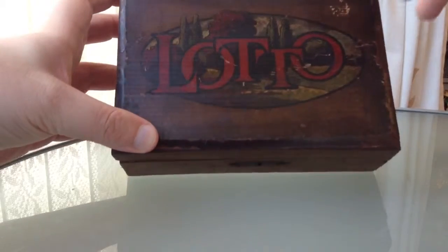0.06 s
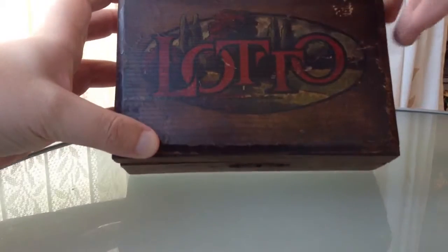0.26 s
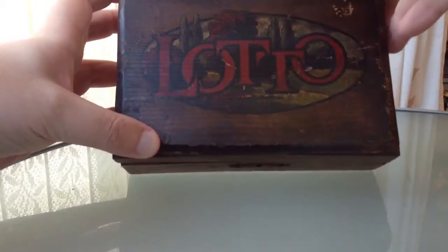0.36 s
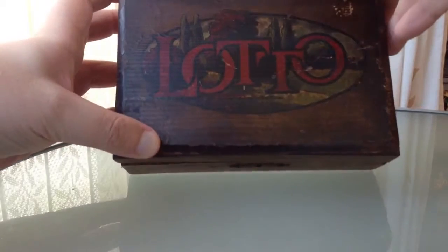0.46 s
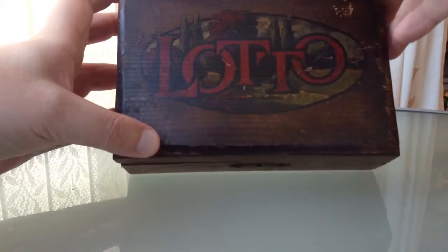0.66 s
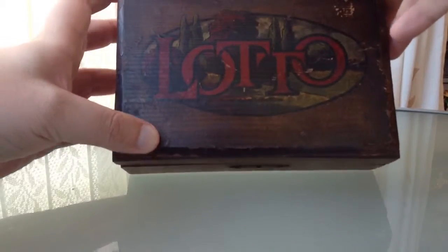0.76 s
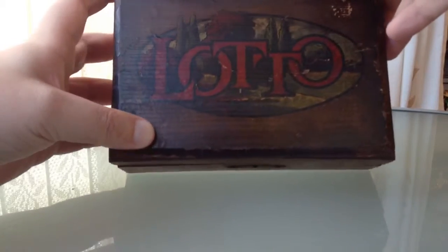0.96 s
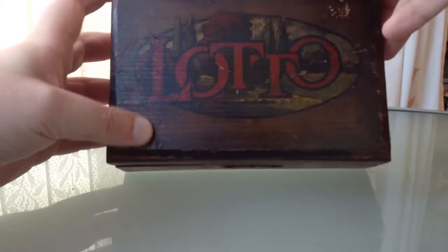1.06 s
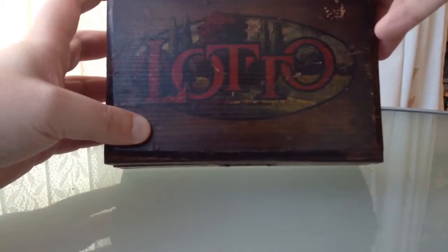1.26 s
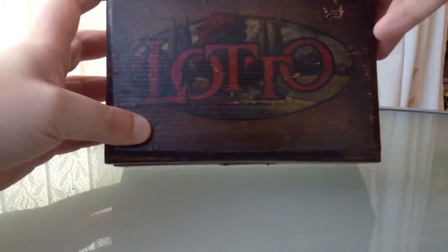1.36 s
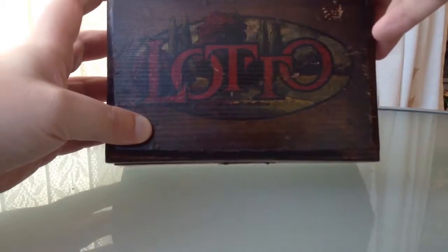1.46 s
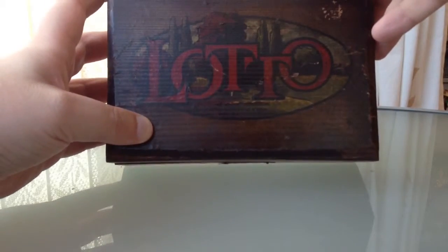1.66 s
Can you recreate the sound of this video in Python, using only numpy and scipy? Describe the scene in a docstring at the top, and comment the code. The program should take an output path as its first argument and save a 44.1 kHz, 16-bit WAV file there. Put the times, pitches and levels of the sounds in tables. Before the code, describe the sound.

A wooden box clacks and knocks close by in a quiet room. After a small latch tick, the lid clacks at 0.2 seconds with a low microphone thud. Dull taps and faint rubbing surround a second clack at 0.65 seconds. Fingers brush the wood, then bump it with a tick near 1.2 seconds. The hardest clack thuds at 1.4 seconds, followed by a brief rattle and lighter knocks.

```python
"""An old wooden box is shifted between two hands on a glass table in a small, quiet room.
A latch ticks; at 0.2 s the lid clacks and the microphone overloads with a low thud. Dull taps follow as
the box rocks and its contents shift; wood rubs faintly on wood. A second clack comes at 0.65 s, then
fingers brush the varnish and bump the hollow box, nails ticking. At 1.39 s the hardest clack overloads
the microphone again; loose pieces chatter, lighter knocks trail off."""
import sys
import numpy as np
from scipy import signal
from scipy.fft import rfft, irfft, next_fast_len
from scipy.io import wavfile

SR = 44100
rng = np.random.default_rng(int(sys.argv[2]) if len(sys.argv) > 2 else 0)


def store_wav(level_fs):
    """Save 16-bit WAV to argv[1]."""
    pcm = np.round(np.clip(np.atleast_2d(level_fs), -1, 1) * 32767)
    wavfile.write(sys.argv[1], SR, pcm.T.astype(np.int16))


N = 74970
TIME_S = np.arange(N) / SR

# room noise spectrum: freq_hz, gain_db
NOISE_SPECTRUM = [(25, -17.5), (70, -44.5), (110, -21), (170, -5.5), (300, 0.5), (600, -3.5), (3000, -15),
                  (7000, -18.5), (15000, -19.5)]
# diffuse reverberation: centre_hz, level_db, t60_s
REVERB_BANDS = [(100.7, -19.5, 0.36), (292, -3, 0.48), (990, -8, 0.23), (2135, -15.5, 0.27),
                (3945, -17.5, 0.27), (6100, -18.5, 0.25), (8560, -20.5, .28), (14200, -39, 0.45)]
# nearest walls: delay_s, level_db
WALL_ECHOES = [(0.0143, -24.5), (0.0326, -30.5)]
# standing waves: pitch_hz, peak_db, t60_s
ROOM_MODES = [(376.7, 1, 0.08), (415, 2.5, 0.26)]

# skin brushing varnish: start_s, length_s, level_db, centre_hz
BRUSHES = [(0.737, 0.31, -63, 10380), (1.021, 0.037, -58.5, 11000), (1.09, 0.049, -53.5, 5830)]
# skin hiss spectrum: freq_hz, gain_db
BRUSH_SPECTRUM = [(300, -17), (1500, 10), (4000, 6.5), (8000, 4), (12000, 8.5), (15000, 3)]
# wood rubbing on wood: start_s, length_s, level_db
RUBS = [(0.135, 0.12, -41.5), (0.377, 0.19, -51.5), (0.682, 0.18, -51.5), (1.205, 0.18, -50)]

# soft finger bumps: start_s, level_db, contact_lowpass_hz, spot_hz, spot_boost_db
BUMPS = [(0.023, -39.5, 300, 213, 29), (1.1745, -20.5, 450, 330, 12.5), (1.1839, -2.5, 480, 403, 9),
         (1.3469, -10, 700, 200, 12.5), (1.352, -4, 900, 794, 6.5), (1.3677, -17.5, 900, 420, 13)]
# hollow box under a soft touch: pitch_hz, peak_db, t60_s
HOLLOW_MODES = [(169, 4.5, 0.042), (325.5, -1, 0.018), (378.4, 2.5, 0.014), (546, 0.5, 0.012),
                (802, 9.5, 0.04)]
# small bright ticks of latch and fingernails: start_s, level_db
TICKS = [(0.1068, -12), (0.439, -11), (.7650, -8.5), (1.1828, 1)]
# tick spectrum: freq_hz, gain_db
TICK_SPECTRUM = [(1000, -21.5), (2300, -12), (4000, -20), (6500, -13), (8000, -20.5), (11700, -15.5),
                 (14200, -22.5)]

# dense weak modes crackling after a contact: freq_hz, gain_db
CRACK_SPECTRUM = [(60, -43.5), (200, -25), (450, -0.5), (1300, -2), (3100, 6.5), (6000, 5.5), (10000, 5),
                  (12500, -6.5), (15000, 4.5)]
# dull taps: start_s, level_db, contact_lowpass_hz, spot_hz, spot_boost_db
TAPS = [ (.1500, -25.5, 3040, 1400, 18), (0.4409, -13.5, 2700, 1770, 6), (0.4756, -13, 2370, 1870, 10),
        (0.5036, -8, 3040, 1950, 11.5), (0.525, -19.5, 2100, 1030, 11.5), (0.5782, -8.5, 4660, 322, 6),
        (0.593, -1.5, 2670, 790, 4), (.6552, 3, 2920, 2380, 12.5), (0.7238, -8.5, 2370, 715, -6.5),
        (0.735, -8, 2170, 1300, -2), (0.7984, -12.5, 2560, 940, 2.5), (0.8425, -23.5, 2690, 890, 3),
        (0.8591, -18.5, 2600, 2070, 1), (.9285, -26, 1890, 540, 12.5), (1.0978, -17, 2470, 396, 5.5),
        (1.2698, -9, 2580, 2030, 4.5), (1.2946, -13, 3130, 900, 5.5)]
# whole loaded box: pitch_hz, peak_db, t60_s
BOX_MODES = [(308, 0, 0.052), (409, -3, .035), (556, 5.5, 0.014), (837, 6.5, 0.013), (994, 1, 0.025),
             (1371, 3, 0.02), (1667, 1, 0.022), (2008, 5, 0.014), (3000, -2.5, 0.079), (4140, -2.5, 0.0042)]

# low thuds of the microphone overloading: start_s, level_db
OVERLOAD_THUDS = [(0.2108, 0.5), (1.3856, -5)]
# lid on box: start_s, level_db, contact_lowpass_hz, spot_hz, spot_boost_db, grip_choke_cycles
LID_KNOCKS = [ (.1104, -23, 8300, 2050, 14.5, 300), (.1637, -14, 3960, 2740, 10.5, 100),
              (.2060, 1.5, 3500, 870, 3.5, 100), (.2129, -4, 9300, 2650, 16.5, 70),
              (.2212, -24, 2927, 955, 25, 100), (.2516, -11.5, 3100, 2020, 6, 100),
              (.2543, -6.5, 3260, 2000, 11.5, 300), (.2742, -7.5, 2670, 930, 4.5, 200),
              (.4124, -23, 7260, 1900, 17, 250), (.6544, -5, 8000, 4280, 13, 70),
              (.6556, -15, 12300, 6140, 15, 200), (1.3144, -23, 3120, 2610, 9.5, 120),
              (1.3860, 4.5, 15740, 3250, 13, 26), (1.4443, -6.5, 6600, 3100, 7.5, 70),
              (1.4611, -13.5, 3550, 1010, 2, 100), (1.4737, -15.5, 3150, 1990, 1.5, 120),
              (1.6384, -38, 3240, 980, 17, 150)]
# lid wood, ungripped: pitch_hz, peak_db, t60_s
LID_MODES = [(435, 7.5, 0.013), (913, 15, 0.075), (966, 16, 0.028), (1294, 10.5, 0.17), (2011, 22, 0.044),
             (2450, 11.5, 0.02), (2826, 13, 0.011), (3460, 3.5, 0.01), (4234, 14.5, 0.03), (4980, 12, 0.01),
             (6214, 14, 0.016), (7130, -3.5, 0.02), (9900, 3.5, 0.0054), (13780, 8.5, 0.0041)]


def from_db(db):
    """Decibels to gain."""
    return 10 ** (np.asarray(db) / 20)


def unit_rms(x):
    """Scale to rms 1."""
    return x / np.sqrt(np.mean(x ** 2) + 1e-20)


def add(out, start_s, x):
    """Mix x into out from start_s on."""
    i = max(int(round(start_s * SR)), 0)
    out[i:i + len(x)] += x[:len(out) - i]


def decay(t60_s, size):
    """Exponential decay of energy 1."""
    fade = from_db(-60 * TIME_S[:size] / t60_s)
    return fade / np.linalg.norm(fade)


def stroke(start_s, length_s, level_db):
    """Half-sine swell and fade."""
    return from_db(level_db) * np.sin(np.pi * np.clip((TIME_S - start_s) / length_s, 0, 1))


def lowpass(x, cutoff_hz):
    """Treble roll-off, third order."""
    return signal.sosfilt(signal.butter(3, cutoff_hz, fs=SR, output="sos"), x)


def highpass(x, cutoff_hz, order=2):
    """Bass roll-off."""
    return signal.sosfilt(signal.butter(order, cutoff_hz, "high", fs=SR, output="sos"), x)


def colour(x, spectrum):
    """Minimum-phase filter through (freq_hz, gain_db) points."""
    freq_hz, gain_db = np.transpose(spectrum)
    size = 2 * next_fast_len(len(x))
    bins_hz = np.maximum(np.fft.rfftfreq(size, 1 / SR), 1)
    gain = from_db(np.interp(np.log(bins_hz), np.log(freq_hz), gain_db))
    cepstrum = irfft(np.log(gain))[:size // 2]
    cepstrum[1:] *= 2
    return irfft(rfft(x, size) * np.exp(rfft(cepstrum, size)))[:len(x)]


def resonate(x, pitch_hz, width_hz):
    """One resonance, peak gain 1."""
    radius = np.exp(-np.pi * width_hz / SR)
    feedforward = np.array([1, 0, -1]) * (1 - radius ** 2) / 2
    feedback = [1, -2 * radius * np.cos(2 * np.pi * pitch_hz / SR), radius ** 2]
    return signal.lfilter(feedforward, feedback, x + 1e-18)


def body(x, modes, spread_db=0):
    """Parallel modes driven by x, levels randomised by spread_db."""
    out = np.zeros(len(x))
    for pitch_hz, peak_db, t60_s in modes:
        gain = from_db(peak_db + spread_db * rng.standard_normal())
        out += gain * resonate(x, pitch_hz, width_hz=np.log(1000) / (np.pi * t60_s))
    return out


def burst(spectrum, t60_s, snap_gain=0):
    """Dying noise and an optional first snap, coloured together."""
    size = N // 16
    spray = rng.standard_normal(size) * decay(t60_s, size)
    return colour(spray + snap_gain * signal.unit_impulse(size), spectrum)


def ringing(modes, crack_db=0, crack_envelope=1):
    """Wood after a blow: a fresh crack, and modes weighted anew."""
    crack = from_db(crack_db) * burst(CRACK_SPECTRUM, t60_s=0.018, snap_gain=from_db(-7))
    return crack_envelope * crack + body(signal.unit_impulse(len(crack)), modes, spread_db=3.25)


def strike(ring, level_db, contact_lowpass_hz, spot_hz, spot_boost_db):
    """One blow: a softer contact has less treble; the spot struck weights one band."""
    softened = lowpass(ring, contact_lowpass_hz)
    spot_band = resonate(softened, spot_hz, width_hz=spot_hz / 3)
    return from_db(level_db) * (softened + (from_db(spot_boost_db) - 1) * spot_band)


def slips(rate_per_s=820):
    """Tiny contacts at random moments."""
    return (rng.random(N) < rate_per_s / SR) * rng.standard_normal(N)


def room_noise(start_db=-58, fall_db_per_s=3):
    """Quiet hush, sinking slightly."""
    hush = unit_rms(colour(rng.standard_normal(N), NOISE_SPECTRUM))
    return from_db(start_db - fall_db_per_s * TIME_S) * hush


def room_reverb(x, predelay_s=0.0076):
    """Diffuse tail decaying by band, near scatter, two wall echoes, low standing waves."""
    noise_bins = rfft(rng.standard_normal(N))
    log_bins = np.log(np.maximum(np.fft.rfftfreq(N, 1 / SR), 1))
    log_centres = np.log([band[0] for band in REVERB_BANDS])
    tail = np.zeros(N)
    for selector, (_, level_db, t60_s) in zip(np.eye(len(REVERB_BANDS)), REVERB_BANDS):
        band = irfft(noise_bins * np.interp(log_bins, log_centres, selector), N)
        add(tail, predelay_s, from_db(level_db) * band * decay(t60_s, N))
    early = from_db(-11) * rng.standard_normal(N) * decay(t60_s=0.033, size=N)   # off table and hands
    for delay_s, level_db in WALL_ECHOES:
        add(early, delay_s, from_db([level_db]))
    add(tail, predelay_s, body(signal.unit_impulse(N), ROOM_MODES))
    return signal.fftconvolve(x, tail + lowpass(early, cutoff_hz=7000))[:N]


def skin_brushes(boost_db=6.5):
    """Skin hisses smoothly over varnish, one band lifted per stroke."""
    out = np.zeros(N)
    hiss = colour(rng.standard_normal(N), BRUSH_SPECTRUM)
    for *swell, centre_hz in BRUSHES:
        lift = (from_db(boost_db) - 1) * resonate(hiss, centre_hz, width_hz=4500)
        out += stroke(*swell) * unit_rms(hiss + lift)
    return out


def wood_rubs():
    """Wood slips on wood in tiny jerks that ring the box."""
    scrape = unit_rms(lowpass(body(slips(), BOX_MODES), cutoff_hz=2640))
    return scrape * sum(stroke(*rub) for rub in RUBS)


def loose_rattle(centre_hz=5500):
    """Loose pieces chatter brightly after the hardest clack, then settle."""
    width_hz = centre_hz / 3
    chatter = resonate(resonate(slips(), centre_hz, width_hz), centre_hz, width_hz)
    return stroke(start_s=1.392, length_s=0.11, level_db=-50) * unit_rms(chatter)


def latch_and_nail_ticks():
    """Latch and fingernails make small bright ticks."""
    out = np.zeros(N)
    for start_s, level_db in TICKS:
        add(out, start_s, from_db(level_db) * burst(TICK_SPECTRUM, t60_s=0.018))
    return out


def finger_bumps():
    """Soft fingertips ring the hollow box."""
    out = np.zeros(N)
    hollow = body(signal.unit_impulse(N // 8), HOLLOW_MODES)
    for start_s, *blow in BUMPS:
        add(out, start_s, strike(hollow, *blow))
    return out


def box_taps():
    """The box rocks and its contents shift; each dull tap rings the whole loaded box."""
    out = np.zeros(N)
    for start_s, *blow in TAPS:
        add(out, start_s, strike(ringing(BOX_MODES, crack_db=-14), *blow))
    return out


def overload_thuds():
    """Low thud of the microphone overloading: a low-passed pulse at each of the two hardest clacks."""
    pulses = np.zeros(N)
    for start_s, level_db in OVERLOAD_THUDS:
        add(pulses, start_s, from_db([level_db]))
    return lowpass(pulses, cutoff_hz=232.4)


def gripped(modes, choke_cycles):
    """A grip damps every mode, the high ones soonest."""
    pitch_hz, peak_db, t60_s = np.transpose(modes)
    remaining = 1 / (1 + t60_s * pitch_hz / choke_cycles)
    return np.transpose([pitch_hz, peak_db + 20 * np.log10(remaining), t60_s * remaining])


def lid_clacks():
    """The lid strikes the box; the firmer the grip, the drier the clack."""
    out = np.zeros(N)
    for start_s, level_db, contact_lowpass_hz, spot_hz, spot_boost_db, choke_cycles in LID_KNOCKS:
        choke = decay(t60_s=choke_cycles / spot_hz, size=N // 16)
        wood = ringing(gripped(LID_MODES, choke_cycles), crack_envelope=choke / choke[0])
        add(out, start_s, strike(wood, level_db, contact_lowpass_hz, spot_hz, spot_boost_db))
    return highpass(out, cutoff_hz=392)   # the lid's clacks carry little bass


def scene():
    """The box close to the microphone, the room around it; mono."""
    handling = lid_clacks() + box_taps() + finger_bumps() + latch_and_nail_ticks()
    handling += skin_brushes() + wood_rubs() + loose_rattle()
    box = highpass(handling, cutoff_hz=176, order=4)   # microphone bass roll-off
    return (box + room_reverb(box) + overload_thuds() + room_noise())[None]


def record(dry, ceiling=0.72, cutoff_hz=15300):
    """The loudest clacks overload the microphone; the top is cut steeply."""
    clipped = dry / (1 + (dry / ceiling) ** 8) ** (1 / 8)
    return signal.sosfilt(signal.ellip(10, 0.2, 70, cutoff_hz, fs=SR, output="sos"), clipped)


dry = scene()
out = record(dry)
store_wav(out)
```